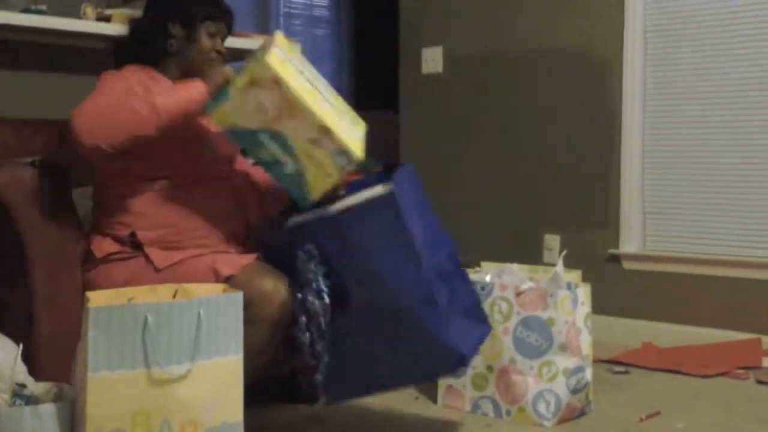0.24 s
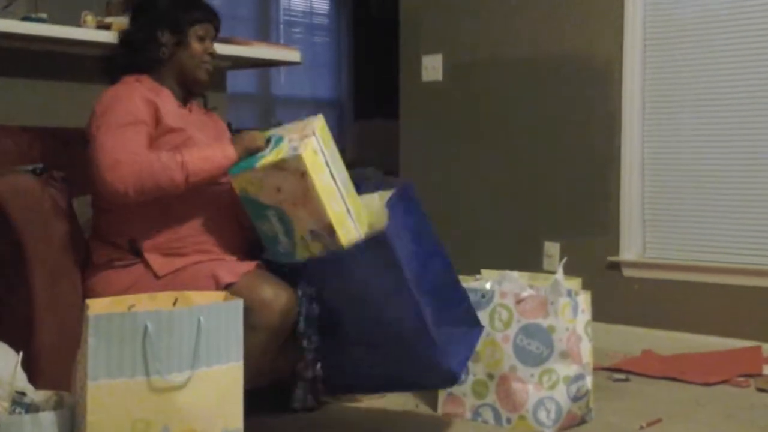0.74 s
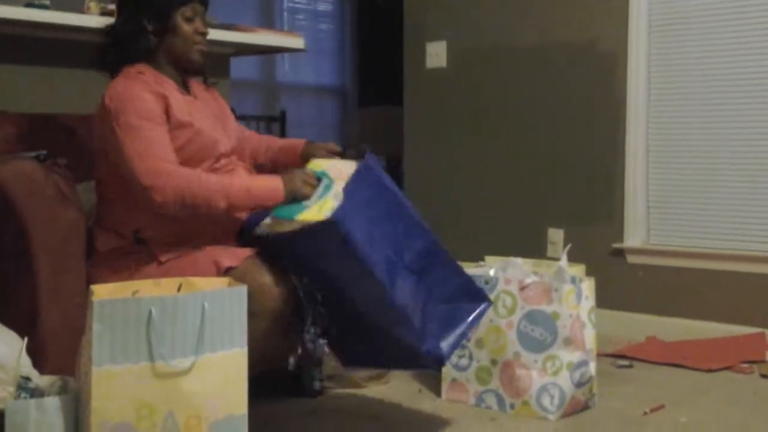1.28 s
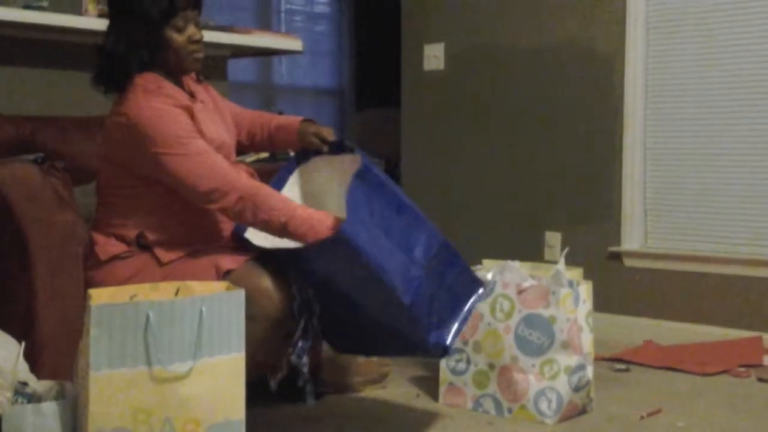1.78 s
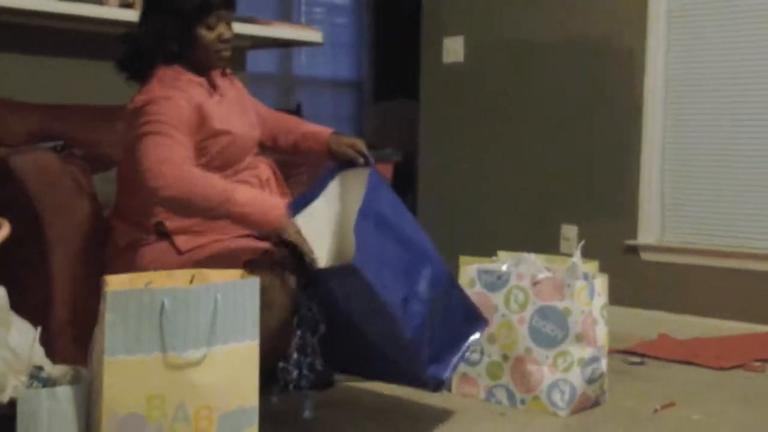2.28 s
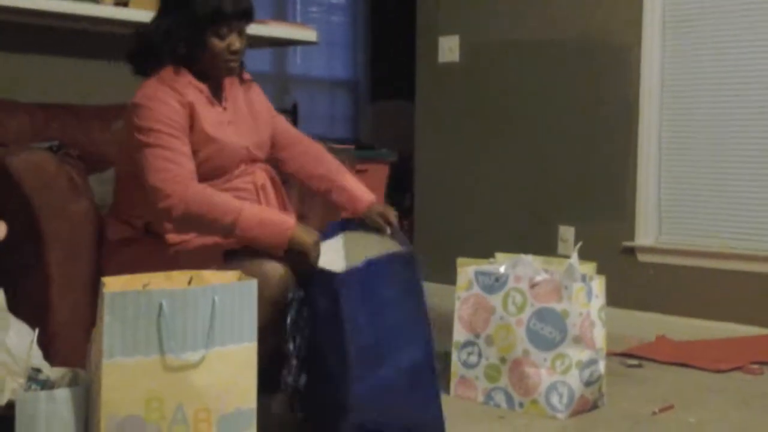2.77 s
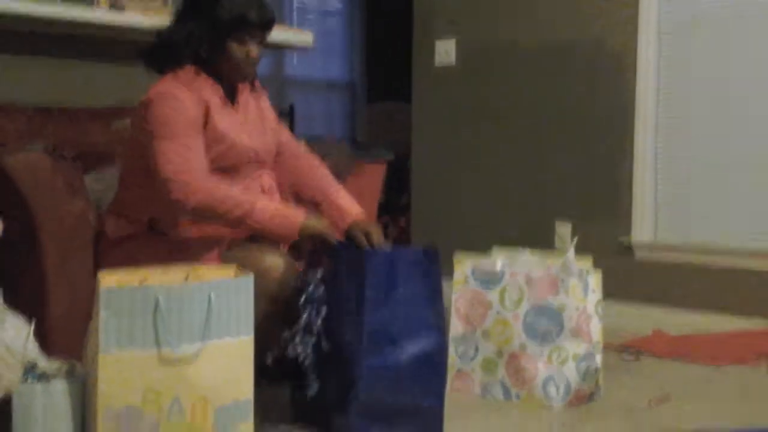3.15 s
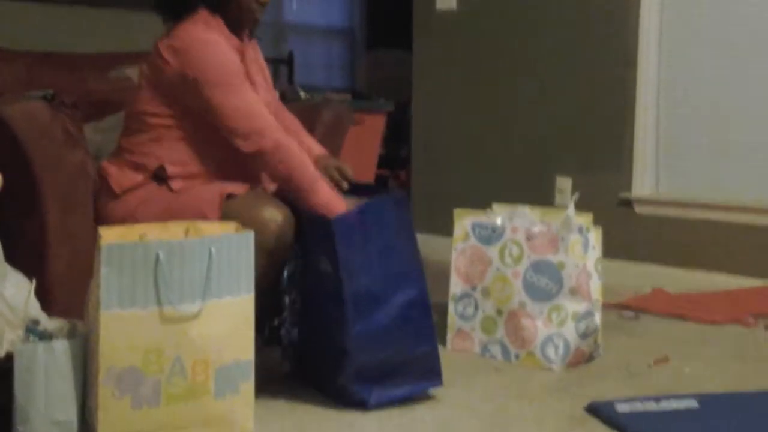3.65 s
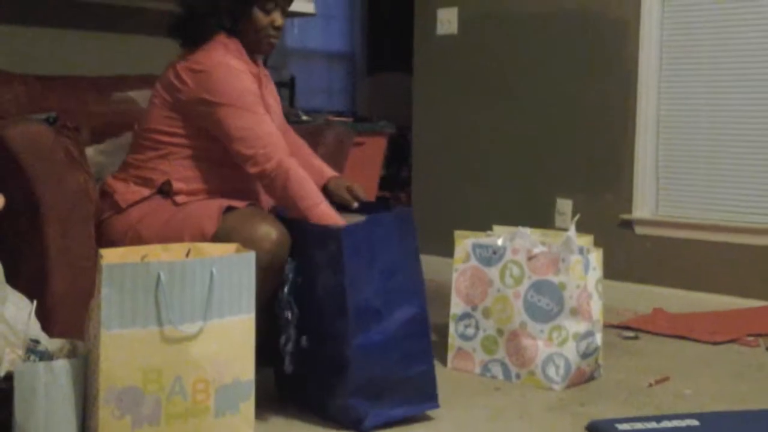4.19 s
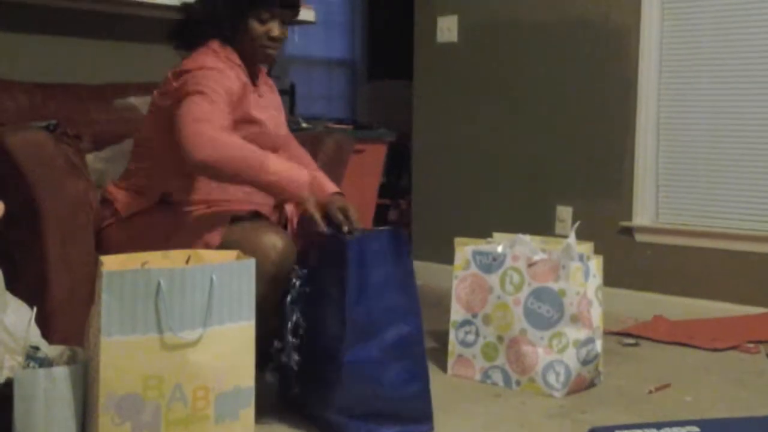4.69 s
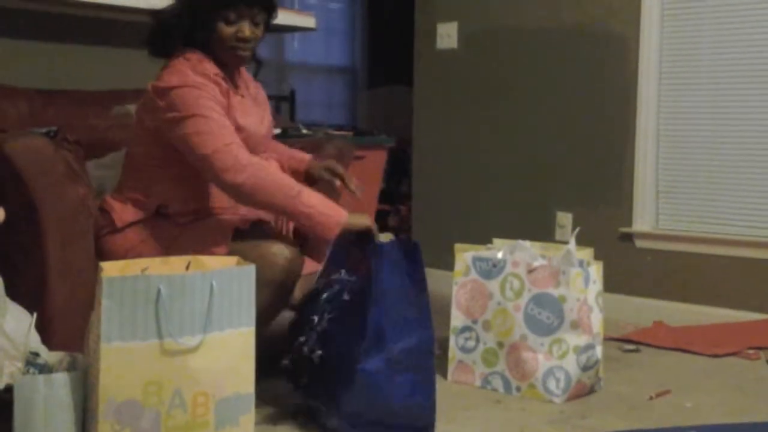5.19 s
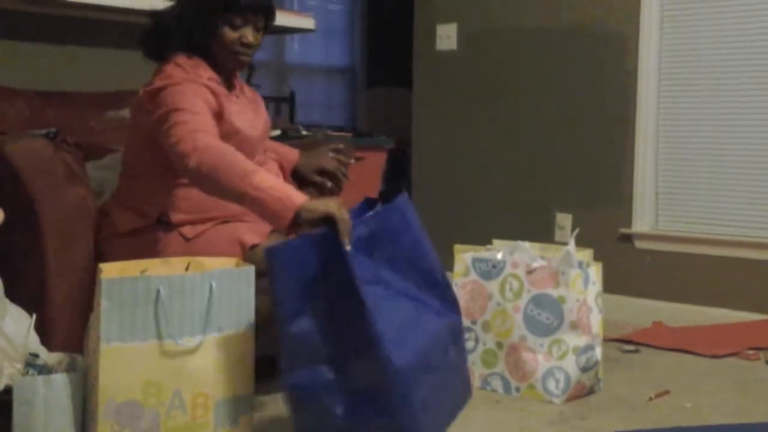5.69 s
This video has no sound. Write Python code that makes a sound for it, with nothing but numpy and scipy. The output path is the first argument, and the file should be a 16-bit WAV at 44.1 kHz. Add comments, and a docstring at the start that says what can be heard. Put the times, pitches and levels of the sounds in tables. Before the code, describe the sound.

Glossy paper bag crinkles, snaps and slides under handling, building to a loud hollow crumple midway, then easing into scattered rustles over faint hiss.

```python
"""A large stiff paper gift bag is filled, shaken and set down on a carpet, a few metres from a camera.
Over steady room tone, hiss and a thin whine, light touches build to the hardest strokes near 3 s, then ease off.
Each stroke makes the wide walls boom as a bank of resonances and the creases crumple as clumps of tiny rings;
the paper snaps with a pop and a rattle, and hands slide over its gloss as fine coloured noise.
A furnished room answers the creases and snaps; the camera adds hiss, more under loud sounds."""
import sys
import numpy as np
from scipy import signal
from scipy.fft import rfft, irfft, next_fast_len
from scipy.io import wavfile
from scipy.ndimage import uniform_filter1d, map_coordinates

SR = 44100
rng = np.random.default_rng(int(sys.argv[2]) if len(sys.argv) > 2 else 0)


def persist_wave(psi):
    """Save psi, clipped to +-1, as 16-bit WAV."""
    counts = np.round(np.clip(psi, -1, 1) * 32767).astype(np.int16)
    wavfile.write(sys.argv[1], SR, np.atleast_2d(counts).T)


N = 261380  # samples

# Room tone and camera hiss. Each row: frequency in Hz, relative density in dB per Hz.
QUIET_COLOUR = [(18, -31), (30, -15), (43, 7.5), (85, 1.5), (154, -5.5), (200, -5), (336, -8.5), (611, -13),
                (1600, -18.5), (12500, -29), (14900, -35)]
# A thin electronic tone: frequency in Hz, level in dB.
WHINE_TONE = (12478, -90.5)
# Decay of the room. Each row: frequency in Hz, time to fall 60 dB in seconds.
ROOM_DECAY = [(100, 0.35), (1000, 0.19), (4000, 0.29), (12000, 0.036)]
# The bag as a drum. Each row: resonance in Hz, width in Hz, relative strength in dB.
WALL_MODES = [(58.8, 10.3, -4.5), (83, 19.4, -1.5), (131, 25.7, 1), (188.5, 25, -1.5), (228.5, 34.3, -0.5),
              (312, 54.5, -7.5), (373.5, 70, -11.5)]
# Hiss of glossy paper. Each row: frequency in Hz, relative density in dB per Hz.
GLOSS_COLOUR = [(3000, -34.5), (5000, -10), (7000, -8), (9000, -8.5), (11200, -11), (12500, -9.5),
                (14900, -6.5)]
# A narrow hiss within the slide. Each row: frequency in Hz, relative density in dB per Hz.
WHISTLE_COLOUR = [(7500, -26.5), (9000, -20), (9950, -9), (10500, -15), (11200, -47.5)]
# Slides over the glossy paper. Each row: peak in seconds, time to swell 20 dB in seconds,
# time to sink 20 dB in seconds, level in dB, whistle in dB relative to the slide before a common trim.
HAND_SLIDES = [(.78, .1, 0.4, -67, -6), (.94, .3, .15, -70, -9), (1.4, 1.1, 0, -72, -11),
               (1.5, 0.04, 0.12, -55, -14), (1.77, 0.6, 1.2, -65.5, -6), (2.03, 0.13, 0.3, -59, -15),
               (2.15, 0, .3, -69, -6), (2.25, 0, .15, -56.5, -5), (2.31, 0.3, 0.1, -60.5, 2),
               (2.67, 0.23, .2, -61.5, 5), (2.75, .15, 0, -57.5, 3.5), (2.989, .03, .035, -53, -4),
               (3.28, 0.5, .25, -64, -8), (3.5, .13, 0.3, -63.5, -0.5), (3.83, .03, .25, -67, -20),
               (3.95, 0, .25, -63.5, -1), (4.51, 1.2, 0.5, -70.5, -12), (4.69, .1, 0, -75, -6),
               (5.25, 0.3, .4, -65.5, -12), (5.45, .5, 0.3, -68.5, -5), (5.69, .3, .15, -80, -4.5)]
# Pushes and pulls of the hands. Each row: peak in seconds, time to swell 20 dB in seconds (sign ignored),
# hold in seconds, creasing in dB, wall boom in dB, crispness in dB relative to the creasing.
HAND_STROKES = [(.18, 0.1, .005, -71.5, -68, -19.5), (0.295, -0.6, .005, -72, -74, -14),
                (0.476, 0, .005, -71.5, -65.5, -20), (0.582, 0, 0.014, -59, -56.5, -13),
                (0.657, 0.13, .02, -67, -59, -12), (0.738, .05, .005, -58, -47.5, -9.5),
                (0.785, 0.0064, 0.0046, -50.5, -49.5, -5), (.885, 0.025, 0.009, -50, -49.5, -5.5),
                (1.085, 0.24, .005, -68.5, -62, -9), (1.183, 0.07, 0.031, -60, -58, -10),
                (1.288, 0.05, 0.058, -64.5, -61, -9), (1.387, 0.07, 0.014, -57.5, -55.5, -10.5),
                (1.464, 0.32, .005, -76, -53, -11), (1.507, 0.0034, 0.032, -47, -42.5, -7.5),
                (1.632, 0.02, .005, -45, -46, -15), (1.681, 0.0346, 0.033, -49, -49.5, -8.5),
                (1.737, 0.0664, .02, -43.5, -48.5, -8.5), (1.896, 0.2, 0.048, -58.5, -54, -10),
                (1.983, 0.08, 0.03, -49.5, -44.5, -7.5), (2.07, .1, .01, -47.5, -42, -11.5),
                (2.15, 0.03, 0.019, -49.5, -46, -7.5), (2.254, 0.14, .005, -51, -48.5, -4.5),
                (2.334, .06, 0.019, -49.5, -43.5, -8), (2.5, .02, .025, -55.5, -54.5, -3.5),
                (2.567, 0.04, .02, -55.5, -53.5, -3.5), (2.66, 0.07, 0.0059, -45.5, -46.5, -7.5),
                (2.756, 0.25, 0.052, -58.5, -46, -13), (2.827, .03, 0.045, -36.5, -32, -8.5),
                (2.96, 0.13, .02, -47.5, -39.5, -7), (3.003, 0.09, 0.026, -43.5, -37.5, -9),
                (3.097, .12, 0.024, -42.5, -39, -5.5), (3.193, 0.04, 0.024, -59, -46, -8),
                (3.235, -0.02, 0.0062, -46.5, -43.5, -8), (3.363, 2.9, 0.045, -69.5, -58.5, -5),
                (3.468, 0.16, 0.0088, -65.5, -49.5, -6), (3.726, 0.12, 0.039, -71.5, -56, -5),
                (3.817, 0.12, 0.018, -61, -49.5, -16), (3.879, 0.1, 0.068, -65, -49.5, -9.5),
                (4.04, 0.4, 0.045, -74, -65, -4.5), (4.19, .015, 0.021, -57, -53, -7),
                (4.333, 0.07, 0.044, -56, -49.5, -6.5), (4.402, 0.0346, .01, -49, -47, -6.5),
                (4.454, 0.13, 0.05, -47, -39, -5.5), (4.678, 0.1, .005, -69, -57, -10),
                (4.898, -0.03, .004, -74, -61.5, -5), (5.006, -0.1, 0.043, -65.5, -63, -7),
                (5.106, 0.02, .02, -61.5, -55.5, -6), (5.165, .04, 0.027, -58.5, -50.5, -8),
                (5.208, 0, 0.03, -49, -46.5, -3.5), (5.32, 0.23, 0.047, -58.5, -54, -9),
                (5.419, .035, 0.013, -50, -46.5, -5.5), (5.597, 0.06, .004, -76, -59.5, -11),
                (5.662, .006, .02, -64.5, -61.5, -14), (5.872, -3, .005, -81, -87, -20)]
# Snaps of the paper, with some weaker bursts within the strokes. Each row: start in seconds, level in dB,
# panel pitch in Hz, then thump, crispness and edge in dB relative to that level, all before the mix gains.
PAPER_SNAPS = [(.173, -61.5, 637, -12, -13, -18), (.287, -60, 620, -2, -22, -17),
               (.544, -52, 800, -5, -26, -24), (.581, -50, 624, -17, -28, -27),
               (.727, -42, 1100, -2, -19, -29), (.783, -42, 700, -1.5, -10.5, -26),
               (.868, -47, 740, -13, -16, -26), (.886, -42, 950, -10, -14, -31),
               (1.137, -55, 610, -3, -13, -22), (1.494, -44.5, 466, -11, -7, -11.5),
               (1.5, -38.5, 666, -7, -9, -21), (1.602, -39.5, 580, -3, -25, -26.5),
               (1.624, -31.5, 750, -7, -24, -50), (1.759, -30.5, 514, -11.5, -22, -38),
               (1.916, -47, 476, -7, -11.5, -22), (1.962, -42, 624, -1, -19, -23),
               (2.029, -41, 735, 6.5, -28, -4), (2.146, -39.5, 1000, -13, -10, -32),
               (2.245, -40, 432, 0.5, -10.5, -19), (2.333, -44.5, 725, -12, -7.5, -22),
               (2.497, -39, 1250, -20, -17, -32), (2.56, -45, 1130, -10, -6.5, -22),
               (2.638, -40, 513, -17, -17, -34), (2.815, -21, 537, -12, -16, -20),
               (2.864, -27.5, 530, -3, -13.5, -39.5), (2.989, -37, 620, -8, -17, -35),
               (3.093, -35.5, 656, -2.5, -10, -42), (3.23, -38.5, 920, 1.5, -19, -27),
               (3.443, -49, 1230, 7, -13, -8), (3.719, -62, 780, 7, -8, -16),
               (3.812, -43, 794, -25, -9.5, -3), (3.934, -48.5, 455, 3.5, -16, -1),
               (4.185, -50.5, 580, -4, -15, -25), (4.322, -47, 665, 0.5, -13, -20.5),
               (4.398, -45, 398, -13, -19, -28), (4.416, -35.5, 624, -6, -13, -24),
               (4.66, -33, 636, -4.5, -23.5, -17), (4.99, -53.5, 870, -14, -11, -19),
               (5.205, -39.5, 670, -9.5, -9, -17), (5.401, -42, 610, -9, -19, -28),
               (5.592, -46, 420, -12.5, -8, -15), (5.659, -58, 640, -8, -8, -19),
               (5.873, -61, 470, -10, -19, -19)]
# A snap's rattle. Each row: frequency in Hz, colour in dB.
CRACK_COLOUR = [(350, -24), (700, -8), (1200, 0), (1900, 3), (2700, -9), (4500, -15), (8000, -30),
                (12000, -59)]
# The tick at a snap's start. Each row: frequency in Hz, colour in dB.
EDGE_COLOUR = [(2500, -55), (4000, -10), (8000, -7.5), (14000, -15)]
# Soft folds. Each row: frequency in Hz, colour in dB.
SOFT_FOLD_COLOUR = [(200, -26), (350, -3.5), (550, 0.5), (900, -3), (1400, -5.5), (2200, -34.5)]
# Sharp folds. Each row: frequency in Hz, colour in dB.
CRISP_FOLD_COLOUR = [(900, -28.5), (1500, 5.5), (2000, 0.5), (2800, -10), (4000, -17), (7000, -29),
                     (12000, -42)]

QUIET_DB = -69.5
CREASE_FALL_S, BOOM_FALL_S = 0.11, 0.11  # time to sink 20 dB after a stroke of -50 dB
FALL_DOUBLES_DB = 40  # a stroke so much stronger takes twice as long to sink
RATTLE_T60_S, RATTLE_DOUBLES_DB = 0.02, 33  # for a snap of -44.5 dB; so much louder, twice as long
TOP_HZ = 14560  # the camera's band limit


def amp(db):
    """Turn dB into gain."""
    return 10 ** (np.asarray(db) / 20)


def unit(x):
    """Bring a sound to an RMS of one."""
    return x / np.sqrt(np.mean(x ** 2) + 1e-20)


def along(points, hz):
    """Read (Hz, value) points along a log frequency axis."""
    f, value = np.transpose(points)
    return np.interp(np.log(hz + 1), np.log(f + 1), value)


def wobble(rate):
    """A smooth random curve with rate knots a second."""
    knots = rng.standard_normal(int(N * rate / SR) + 4)
    return map_coordinates(knots, [np.arange(N) * rate / SR])


def filtered(x, response):
    """Shape x by a complex response of frequency."""
    m = next_fast_len(x.shape[-1] + SR // 4)
    spectrum = rfft(x, m) * response(np.fft.rfftfreq(m, 1 / SR))
    return irfft(spectrum, m)[..., :x.shape[-1]]


def causal(colour):
    """The minimum-phase response with a given (Hz, dB) colour, so nothing sounds ahead of its impulse."""
    def response(hz):
        cepstrum = irfft(np.log(amp(along(colour, hz))))
        half = len(cepstrum) // 2
        cepstrum[1:half] *= 2
        cepstrum[half + 1:] = 0
        return np.exp(rfft(cepstrum))
    return response


def steady(x, seconds):
    """Even out slow loudness, leaving the level to the hand's effort."""
    power = np.abs(uniform_filter1d(x ** 2, round(seconds * SR)))
    return x / np.sqrt(power + 1e-12)


def swells(peak_s, rise_s, hold_s, fall_s, level_db):
    """Gain of overlapping gestures, each swelling to its peak, holding and sinking; powers add."""
    step = 88  # samples between gain points
    t = np.arange(0, N + step, step) / SR - np.asarray(peak_s)[:, None]
    before = -t / np.abs(rise_s)[:, None]
    after = (t - np.abs(hold_s)[:, None]) / np.abs(np.reshape(fall_s, (-1, 1)))
    drop_db = 20 * np.maximum(0, np.maximum(before, after))
    power = amp(level_db[:, None] - drop_db) ** 2
    return np.interp(np.arange(N) / step, np.arange(t.shape[1]), np.sqrt(power.sum(0)))


def letting_go(fall_s, level_db):
    """Light touches die away sooner than hard pulls."""
    return fall_s * 2 ** ((level_db + 50) / FALL_DOUBLES_DB)


def buckles(rate, spread_db, clump_db, rub):
    """Tiny random buckling impulses that come in clumps, over a share of steady rubbing."""
    when, size, sign = rng.random((3, N))
    sizes = amp(-spread_db * np.log(size + 0.09))  # few large, many small
    pops = (when < rate / SR) * sizes * np.sign(sign - 0.5)
    return unit(pops * amp(clump_db * wobble(40))) + rub * rng.standard_normal(N)


def quiet():
    """Room tone and hiss are coloured noise; a faint whine drifts a little in phase and level."""
    tone = unit(filtered(rng.standard_normal(N), causal(QUIET_COLOUR)))
    whine_hz, whine_db = WHINE_TONE
    phase = 2 * np.pi * whine_hz * np.arange(N) / SR + 1.0 * wobble(12)
    whine = np.sqrt(2) * amp(whine_db + 1.6 * wobble(10)) * np.sin(phase)
    return amp(QUIET_DB + 2.0 * wobble(2.84)) * tone + whine


def room(x, wet_db):
    """Direct sound plus a slightly late tail of noise in which each frequency dies at its own speed."""
    hz, t, z = signal.stft(rng.standard_normal(SR // 3), SR, nperseg=256)
    decay = amp(-60 * t / along(ROOM_DECAY, hz)[:, None])
    tail = signal.istft(z * decay, SR, nperseg=256)[1]
    late = np.pad(x, (250, 0))
    return x + amp(wet_db) * signal.fftconvolve(late, tail / np.linalg.norm(tail))[:len(x)]


def drum(f):
    """The wall resonances of the bag, summed with alternating polarity."""
    total = 0
    for k, (centre, width, db) in enumerate(WALL_MODES):
        mode = 1j * f * width / (centre * centre - f * f + 1j * f * width)
        total = total + (-1) ** k * amp(db) * mode
    return total


def walls():
    """Shoves and flexing drive the low modes of the bag."""
    peak_s, rise_s, hold_s, _, boom_db, _ = np.transpose(HAND_STROKES)
    effort = swells(peak_s, rise_s, hold_s, letting_go(BOOM_FALL_S, boom_db), boom_db)
    flexing = buckles(250, 2.05, 3.5, rub=0.68)
    return effort * steady(filtered(flexing, drum), 0.089)


def sliding():
    """Skin and cardboard hiss finely over the coated paper, at times with a narrow whistle."""
    peak_s, rise_s, fall_s, level_db, whistle_db = np.transpose(HAND_SLIDES)
    rubbing = buckles(4000, 5.0, 1.0, rub=1.16)
    broad = unit(filtered(rubbing, causal(GLOSS_COLOUR)))
    narrow = unit(filtered(rubbing, causal(WHISTLE_COLOUR)))
    no_hold = 0 * peak_s
    broad_gain = swells(peak_s, rise_s, no_hold, fall_s, level_db)
    narrow_gain = swells(peak_s, rise_s, no_hold, fall_s, level_db + whistle_db - 5.5)
    return broad_gain * broad + narrow_gain * narrow


def snaps():
    """Each snap or burst pops a panel, cracks into a short rattle, pushes the walls and starts with a tick."""
    pop, crisp, push, tick = np.zeros((4, N + SR))
    t = np.arange(SR // 5) / SR

    def fade(t60):
        """Exponential decay reaching -60 dB at t60 seconds."""
        return amp(-60 * t / t60)

    def burst(t60):
        """Decaying noise with a soft onset; longer bursts carry more energy."""
        noise = fade(t60) * (1 - fade(0.012)) * rng.standard_normal(len(t))
        return unit(noise) * np.sqrt(t60)

    for start_s, db, hz, thump_db, crisp_db, edge_db in PAPER_SNAPS:
        start = round(start_s * SR)
        at = slice(start, start + len(t))
        rattle_s = RATTLE_T60_S * 2 ** ((db + 44.5) / RATTLE_DOUBLES_DB)
        # a panel rings for a few cycles at the pitch given in its row
        ring = fade(7.9 / hz) * (1 - fade(3 / hz)) * np.sin(2 * np.pi * hz * t)
        pop[at] += amp(db) * ring
        crisp[at] += amp(db + crisp_db) * burst(rattle_s)
        shove = t / 0.0013 * np.exp(1 - t / 0.00097)  # one soft push, cresting after about 1 ms
        push[at] += amp(db + thump_db) * shove
        tick[at] += amp(db + edge_db) * burst(0.6 * rattle_s)
    mix = amp(5) * pop
    mix += amp(12.5) * filtered(crisp, causal(CRACK_COLOUR))
    mix += amp(10) * filtered(push, drum)
    mix += amp(4.5) * filtered(tick, causal(EDGE_COLOUR))
    return room(mix[:N], wet_db=-9.0)


def crinkles(rate, spread_db, clump_db, cycles):
    """Small facets flip in clumps; each rings for a few cycles at its own random pitch."""
    when, size, pitch, sign = rng.random((round(rate * N / SR), 4)).T
    start = (when * N).astype(int)
    hz = 300 * (7000 / 300) ** pitch[:, None]  # 300 to 7000 Hz
    t = np.arange(700) / SR
    size_db = -spread_db * np.log(size + 0.021)
    gain = amp(size_db + clump_db * wobble(30)[start])[:, None] * hz / 1000
    decay = amp(-60 * t * hz / cycles)
    rings = gain * decay * np.sin(2 * np.pi * hz * t) * np.sign(sign - 0.5)[:, None]
    places = start[:, None] + np.arange(len(t))
    return unit(np.bincount(places.ravel(), rings.ravel(), N + len(t))[:N])


def creases():
    """The same crinkling feeds a soft body and, when the fold is sharp, a crisp top."""
    peak_s, rise_s, hold_s, level_db, _, crisp_db = np.transpose(HAND_STROKES)
    facets = crinkles(1200, 4.04, 4.0, cycles=8.7)
    pops = room(facets + 0.3 * buckles(300, 3.3, 3.9, rub=0.63), wet_db=-3.5)
    soft = steady(filtered(pops, causal(SOFT_FOLD_COLOUR)), 0.058)
    crisp = steady(filtered(pops, causal(CRISP_FOLD_COLOUR)), 0.057)
    fall_s = letting_go(CREASE_FALL_S, level_db)
    soft_gain = swells(peak_s, rise_s, hold_s, fall_s, level_db)
    crisp_gain = swells(peak_s, rise_s, hold_s, fall_s, level_db + crisp_db)
    return soft_gain * soft + crisp_gain * crisp


def scene():
    """Sum the layers from background to bag, in one channel."""
    return (quiet() + walls() + sliding() + snaps() + creases())[None]


def record(dry):
    """The camera adds hiss that grows with the level, cuts deep bass and all above its band limit."""
    level = np.sqrt(np.abs(uniform_filter1d(dry ** 2, 6000)))
    noisy = dry + amp(-42) * level ** 0.55 * rng.standard_normal(dry.shape)

    def band(hz):
        """Four gentle 30 Hz bass cuts in a row, and a sharp top edge."""
        return (1j * hz / (30 + 1j * hz)) ** 4 * (hz < TOP_HZ)

    return filtered(noisy, band)


dry = scene()
out = record(dry)
persist_wave(out)
```